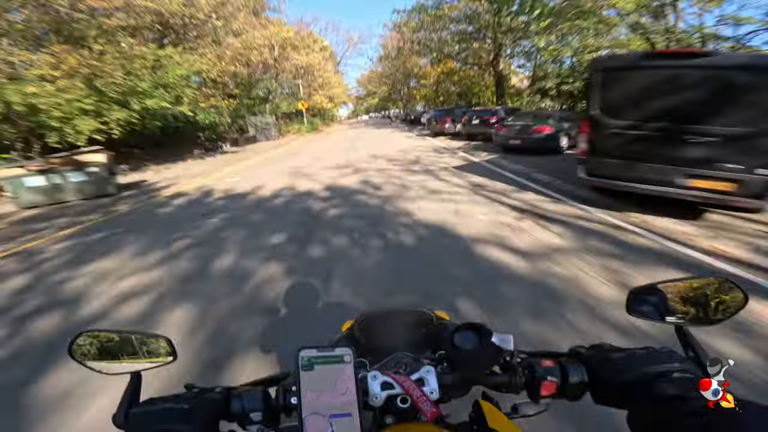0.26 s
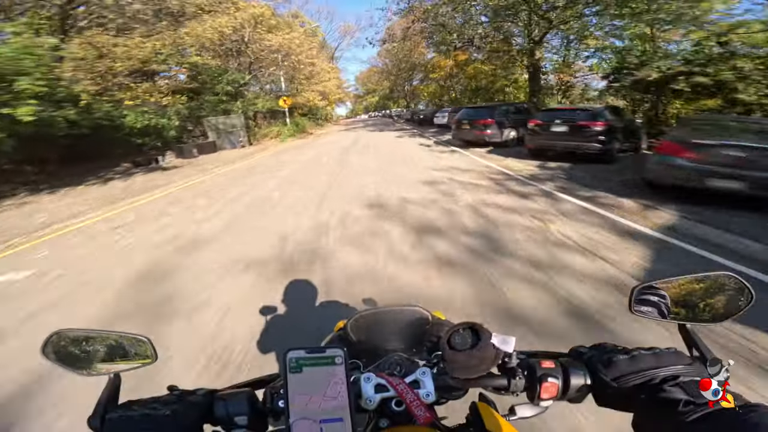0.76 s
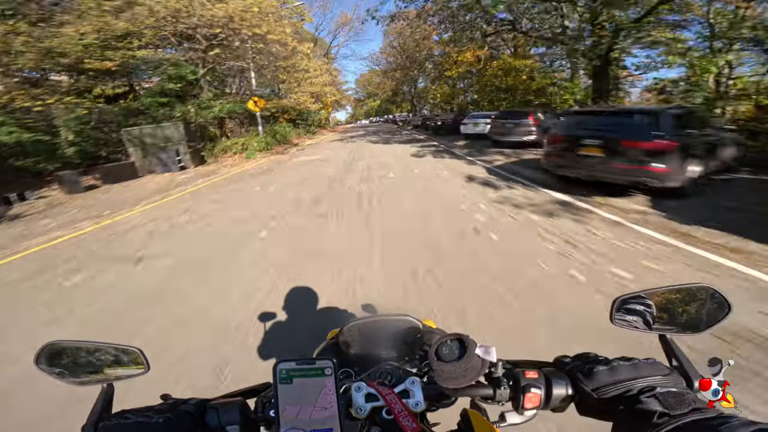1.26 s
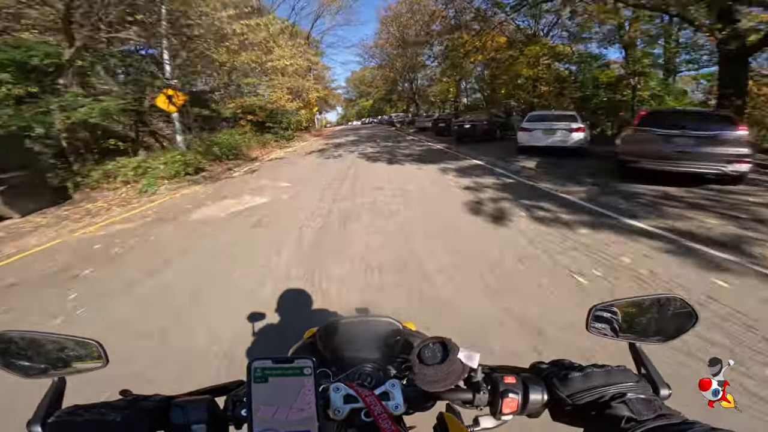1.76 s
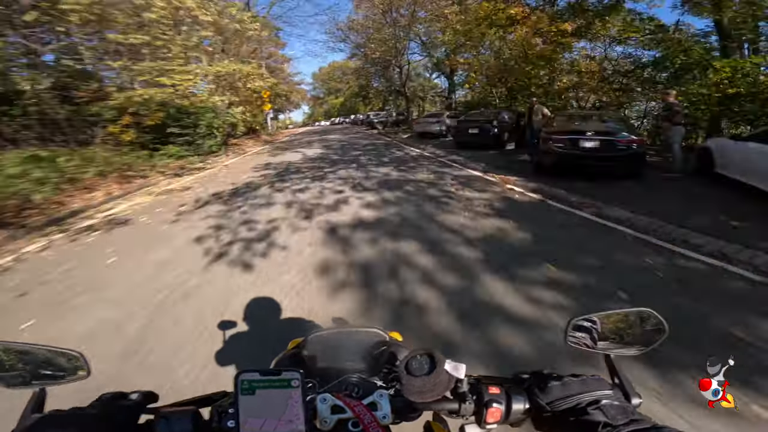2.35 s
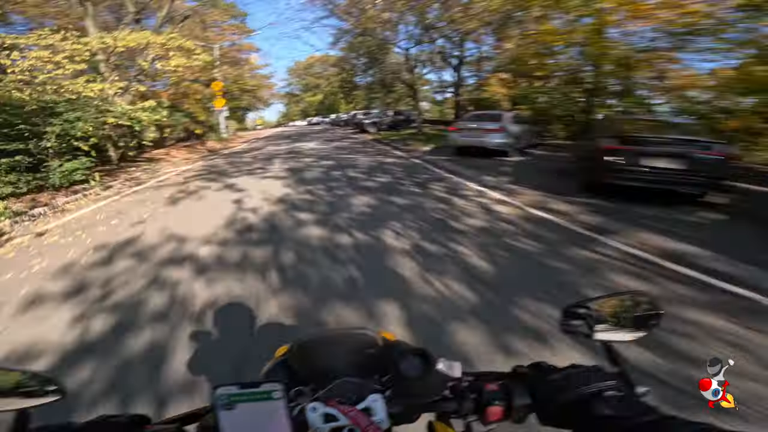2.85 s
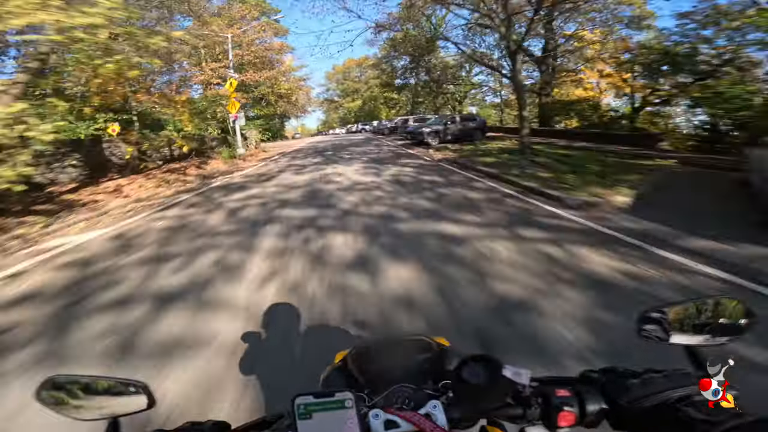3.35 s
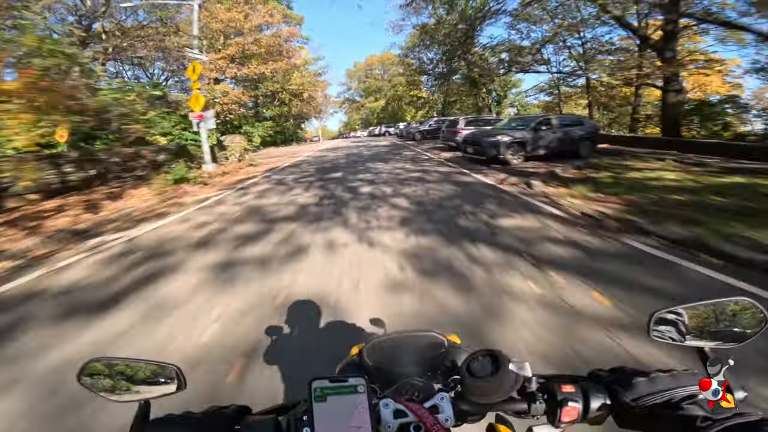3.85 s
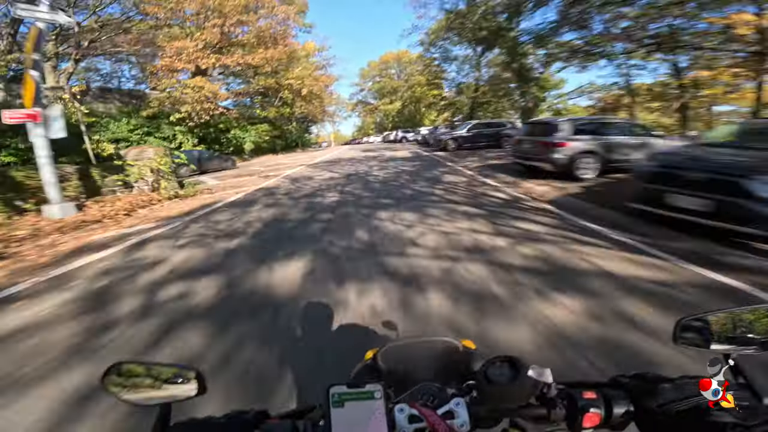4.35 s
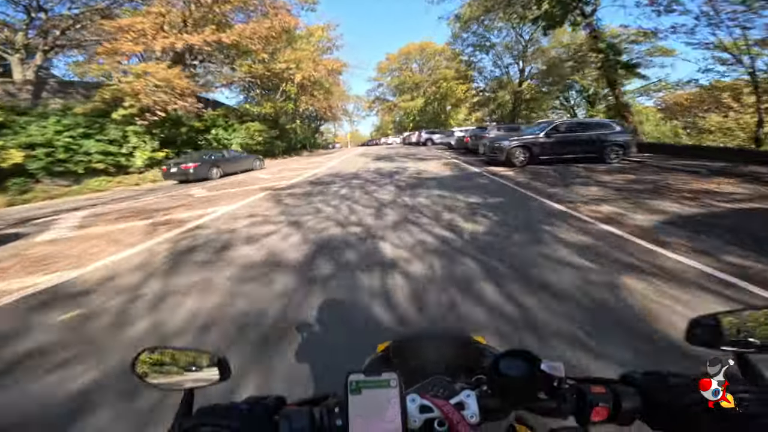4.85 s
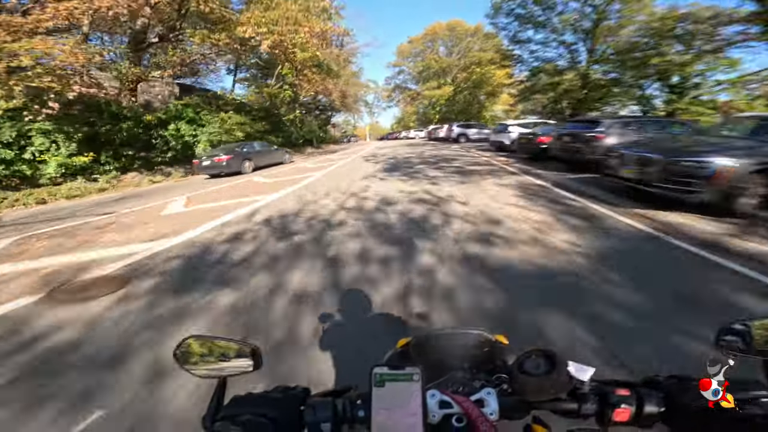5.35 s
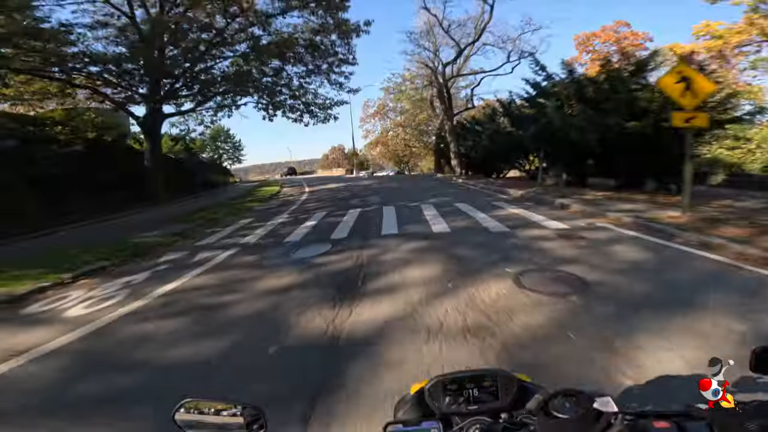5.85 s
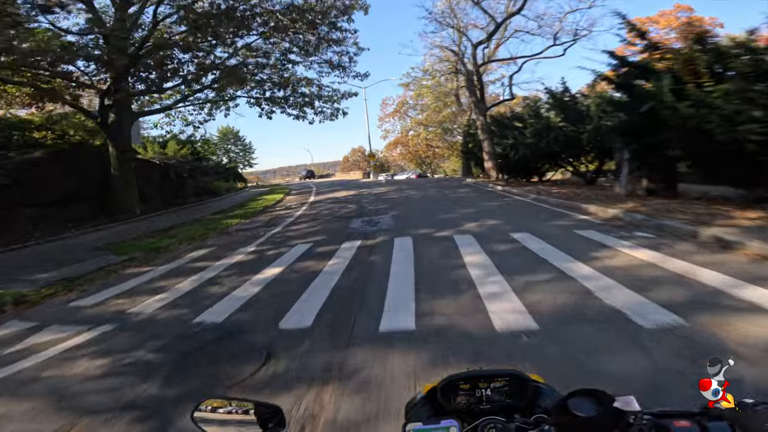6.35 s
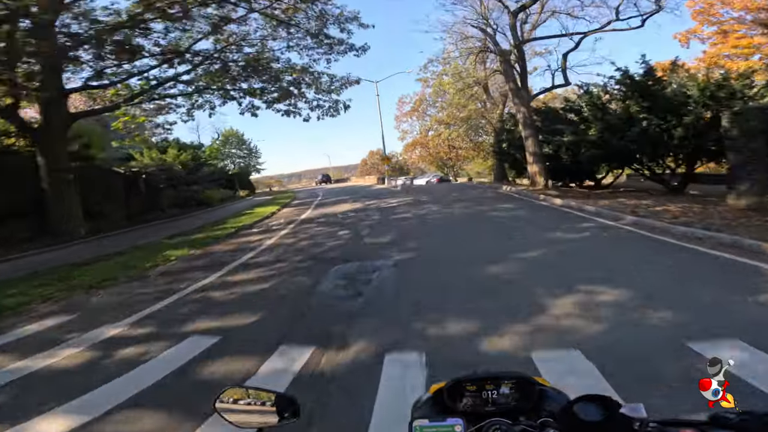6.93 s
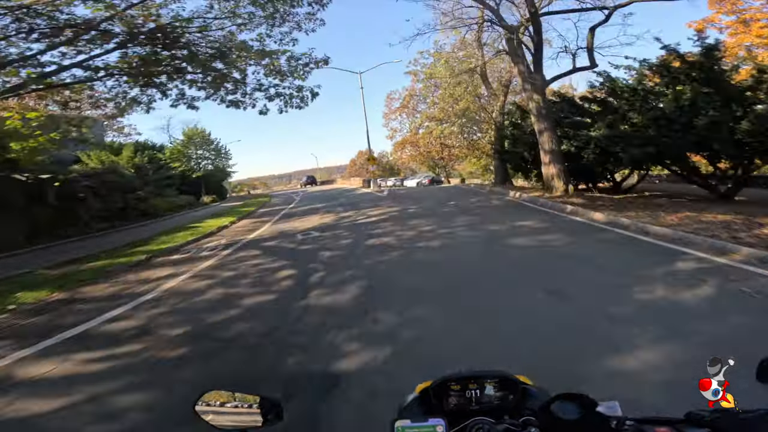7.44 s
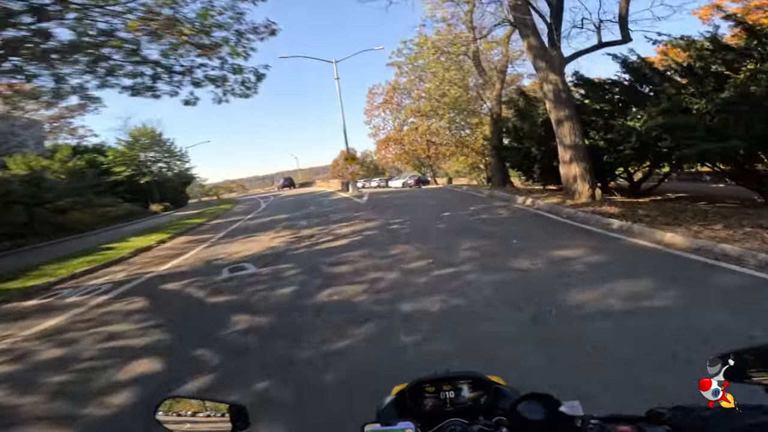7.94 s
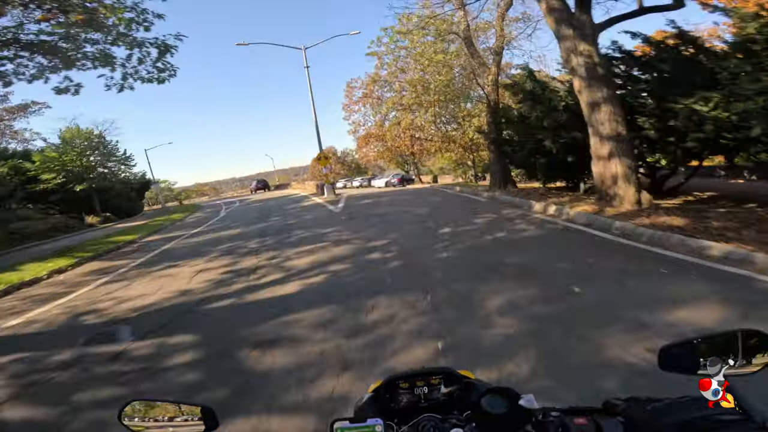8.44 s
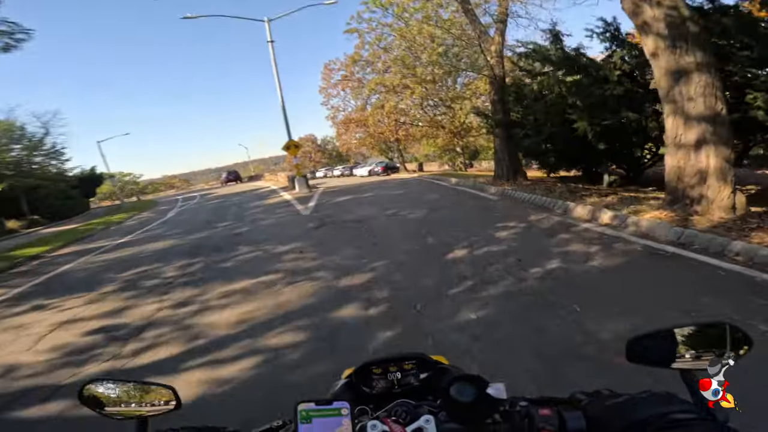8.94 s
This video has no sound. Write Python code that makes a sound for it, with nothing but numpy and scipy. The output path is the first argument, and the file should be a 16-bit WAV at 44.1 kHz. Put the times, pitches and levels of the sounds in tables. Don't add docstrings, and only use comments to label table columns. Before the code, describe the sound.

A motorcycle's open exhaust drones up and eases through a steady cruise, burbles off-throttle, then cuts to slower riding that pops, sinks and pulls away.

```python
import sys
import numpy as np
from scipy import signal
from scipy.io import wavfile
from scipy.ndimage import uniform_filter1d

SR = 44100
rng = np.random.default_rng(int(sys.argv[2]) if len(sys.argv) > 2 else 0)


def makeup_ratio(level_db):
    decades = np.asarray(level_db, float) / 20
    return 10 ** decades


def to_wav(s):
    ch = np.atleast_2d(s).T
    pcm = np.round(np.clip(ch, -1, 1) * 32767)
    wavfile.write(sys.argv[1], SR, pcm.astype(np.int16))


N = 405719
CHANGE_S = 5.8442

# time_s, firing_rate_hz
FAST_SPEED = [(0, 83.2), (.14, 83.8), (.39, 83.7), (.65, 85.8), (1.67, 98.1), (2.09, 103), (2.45, 104.6),
              (2.9, 103.6), (3.25, 102.6), (3.42, 103), (3.49, 101.1), (3.75, 100.6), (4.22, 98.6),
              (4.75, 97), (5.05, 92.3), (5.2, 92), (5.51, 86.2), (5.84, 83.8)]
SLOW_SPEED = [(5.85, 65), (5.98, 62.3), (6.04, 63.2), (6.29, 62.7), (6.41, 63.2), (6.47, 64.6), (6.7, 64.4),
              (6.77, 63.5), (6.86, 60), (7.1, 58.7), (7.36, 53.8), (7.69, 48.2), (7.89, 45.6), (8.3, 45.6),
              (8.46, 44.6), (8.74, 45.3), (9.05, 47.1), (9.2, 47.4)]
DUE_FAST = [5.8269]
DUE_SLOW = [5.894, 6.836, 6.939, 7.141, 7.282, 7.434, 7.551, 7.631, 7.841, 8.044, 8.353]
WANDER, LASH_HZ, LASH = .003, 7.5, (.002, .012)
# time_s, opening_0_to_1
THROTTLE = [(0, 0.89), (2.3, 0.87), (3.5, 0.52), (4.8, 0.38), (4.93, 0.24), (5.0, 0.18), (5.08, 0.07),
            (5.84, 0.06), (5.89, 0), (5.95, 0.4), (5.98, 0.95), (6.79, 0.97), (6.82, 0.08), (6.9, 0),
            (8.05, .0), (8.335, 0.04), (8.35, 0.91), (9.2, 0.95)]
OPENINGS = [0, .3, .6, 1]

CYLINDERS = [1, .92, 1.05]
# fast_delay_s, slow_delay_s
HEADER_DELAYS = [(0, 0), (.00005, .0001), (-.00003, -.00007)]
SKIPS = [2.93, 3.185, 3.595, 3.72, 4.25, 4.56]
UNEVEN_HOT = [.45, .33, .12, .09]
UNEVEN_COOL = [.6, .3, .15, .1]
FLOW_DB, SHUT_FLOW_DB = -18, (3, 9)

# pitch_hz, width_hz, level_db, swing_sense
PIPE_HOT = [
    [(87.5, 21, 11, 0.14), (192, 116, -0.5, -0.5)],
    [(265, 37, 12.5, 0.81)],
    [(355.6, 67.4, 14.5, -0.43)],
    [(472.4, 116, 6, 0.31), (673, 67, -24.5, -1.3), (711.5, 25, -22, 0.89), (842, 100, -16, -0.24), (915, 65, -18, 0.19), (1176, 73, -23, 0.33), (1345, 6, -18, -0.46), (1480, 41, -23, 0.6)],
]
PIPE_COOL = [
    [(59, 79, -19, 0.9), (121, 136, 18, -0.08), (195.3, 9, 1, 0.82)],
    [(303.4, 79, 0.85, 0.94)],
    [(347.6, 175, 1.6, -0.86)],
    [(494.6, 96, -4, 0.77), (664, 31, -19, -1.3)],
]
PIPE_IDLE = [
    [(96, 37, -15.5, -1.1), (143.3, 81, -8.5, -0.61), (219, 33, -29, 0.21)],
    [(282, 63, -20.5, 0.98)],
    [(326.2, 49, -14, 0.76)],
    [(421, 174, -33, -1.32), (498, 110, -35.5, 1), (669, 39, -49.5, -1.2)],
]
IDLE_S = (7.2, 7.5)
# firing_rate_hz, lag_rad
PUMP_LAG = [(46, -.6), (60, .8)]
TRAP_HZ, TRAP_WIDTH_HZ, TRAP_SHARE = 417.4, 15, 0.57
SPEEDS = [45, 63, 83, 86, 89.5, 93, 96, 99.5, 102, 104.5]
# pump_db, low_db, middle_db, upper_db, top_over_upper_db
OPEN_LEVELS = [(-48, -34, -44.5, -44.5, -6.5), (-38, -36, -37, -43, -10), (-33.5, -39, -35, -38, -6.5),
               (-29.5, -36, -65.5, -34, -11), (-32, -36, -48, -33.5, -7.5), (-31.5, -37, -44.5, -38, 2.5),
               (-34.5, -30.5, -50.5, -37, 0.5), (-32, -37.5, -59, -38, 3.5), (-30, -37, -45.5, -40, 5.5),
               (-34, -35, -49, -39.5, 7.5)]
# pump_db, low_db, middle_db, upper_db, top_over_upper_db
EASED_HOT = [
    (1.5, -15, -0.5, -18, -11),
    (-3.5, -9, 13.5, 1, -9.5),
    (-10, 2, 2.5, -1, -6.5),
]
EASED_COOL = [
    (5.5, -16, -12.5, -16.5, -0.45),
    (-10, -0.5, -3.5, 2, -2),
    (6, -14.5, -19.5, -4.5, -1.6),
]
SURGE_LEVELS = [-1, 8, -7, 1.4, 2]
SURGE_S = 0.028
SURGING = [.3, .4, .7, .2]
# time_s, length_s, depth_ratio
STUMBLES = [(.55, .08, -.1), (1.894, 0.057, -.2), (2.12, 0.052, -.2), (2.417, .04, -.2), (3.29, .02, -.3),
            (1.5, 0.098, 1), (3.116, 0.1, 0.44), (3.242, 0.015, 0.8), (3.4, 0.022, 0.2),
            (3.576, 0.053, 0.27), (3.946, 0.027, 0.3), (4.25, 0.057, 1), (4.447, 0.0094, 0.45),
            (4.586, 0.023, 0.95), (4.72, 0.014, 1), (4.85, 0.014, 0.7)]
STUMBLE_LEVELS = [2.5, -11, 1, -0.5, 1.5]

# pitch_hz, density_db_per_hz
HISS_FAST = [(450, 15), (700, 5), (1100, -1.5), (1500, 1), (2200, -3), (2700, -5.5), (3300, -11),
             (5400, -17), (6300, -23.5), (7300, -25.5), (7900, -34), (11600, -38), (13400, -53.5)]
HISS_SLOW = [(450, 15), (680, -4), (820, -17), (1050, -5.5), (1230, -15), (1500, -3.5), (2000, -9.5),
             (2300, -16), (2900, -22.5), (3400, -24), (3800, -27.5), (5500, -30), (7600, -40),
             (10000, -47.5), (13500, -50)]
HISS_FAST_DB, HISS_SLOW_DB = -52, -55.5
HISS_PER_OCTAVE_DB, USUAL_HZ, HISS_SHUT_DB = (6, 5.5), (110, 64), -1.5
# multiple_of_firing_rate, width_hz, level_db
WHINE = [
    (14.2, 60, -10),
    (27.1, 110, 0),
    (55, 500, -17),
]
WHINE_OPEN_DB, WHINE_SHUT_DB = (-76, -74), (-71.5, -70)
WHINE_BEST_HZ, WHINE_SPAN_HZ, WHINE_BEST_DB = 2530, 220, 4.5
# pitch_hz, width_hz, fast_level_db, slow_level_db
PANELS = [
    (1360, 60, -72, -72),
    (2020, 90, -69, -77),
    (2450, 250, -74, -80),
]
BUZZ_OPEN_DB = 2.5

# pitch_hz, density_db_per_hz
WIND = [(12, -20), (30, -8), (60, 0), (110, -6), (200, -14), (400, -18), (540, -24), (650, -38),
        (1200, -70)]
# time_s, level_db
WIND_LEVELS = [(0, -54), (1, -49), (3, -50), (3.6, -47), (4.2, -48), (5, -45), (5.45, -46), (5.55, -53),
               (7.5, -55), (8.2, -54), (9.2, -56)]

# time_s, peak_db
THUDS = [(1.61, -41), (1.87, -40), (2.2, -48), (2.36, -38.5), (2.93, -39), (3.185, -30), (3.33, -38),
         (3.601, -32), (3.72, -33), (4.25, -41), (4.889, -33), (5.2, -38), (5.27, -39), (5.35, -32),
         (5.411, -37), (5.475, -28)]
THUD_HZ, THUD_S = 63, .009

# time_s, peak_db
SINGLES = [(5.178, -35), (5.219, -32), (5.269, -57), (5.346, -31), (5.403, -30), (5.462, -30.5),
           (5.501, -34.5), (6.94, -34), (6.992, -34), (7.143, -36), (7.552, -28.5), (7.793, -35),
           (7.841, -35), (7.955, -33), (6.896, -47), (7.212, -50), (8.019, -40), (8.246, -29), (8.268, -33),
           (8.155, -33.5), (5.91, -40), (5.925, -30)]
PAIRS = [(6.799, -45), (7.285, -33), (7.357, -33), (7.436, -33.5), (7.736, -34), (8.178, -28), (8.291, -25)]
TRIPLES = [(5.895, -30.5), (6.839, -30), (7.632, -31), (8.044, -30.5)]
POP_MIX = [
    (0.511, 2.4, 1.3),
    (1.059, 2.7, 0.64),
    (1.4, 1.3, 1.5),
]
POP_S = (6.7, 6.8)

RATTLE_S, RATTLE_DB = 8.52, -83


def evened(x):
    return x / np.sqrt(np.mean(x ** 2) + 1e-20)


def drifting(size):
    once = uniform_filter1d(rng.standard_normal(N), size=size)
    return evened(uniform_filter1d(once, size=size))


def over_time(rows):
    s, *columns = np.transpose(rows)
    return [np.interp(np.arange(N) / SR, s, c) for c in columns]


def either(before, after):
    return np.where(np.arange(N) < CHANGE_S * SR, before, after)


def staged(hot, cool, idle, between=IDLE_S):
    share = np.interp(np.arange(N) / SR, between, [0, 1])
    return either(hot, (1 - share) * cool + share * idle)


def by_throttle(hot, cool):
    opening = over_time(THROTTLE)[0]
    return either(np.interp(opening, OPENINGS, hot), np.interp(opening, OPENINGS, cool))


def resonate(x, hz, width):
    turn = np.exp(2j * np.pi * np.cumsum(hz * np.ones(len(x))) / SR)
    r = np.exp(-np.pi * width / SR)
    smooth = signal.lfilter([1], np.convolve([1, -r], [1, -r]), x / turn)
    return evened((turn * smooth).real)


def ring(modes):
    t = np.arange(6000) / SR
    waves = np.zeros(6000)
    for hz, width, db, sense in modes:
        swell = width ** 2 * t * np.exp(-np.pi * width * t)
        waves += sense * makeup_ratio(db) * swell * np.sin(2 * np.pi * hz * t)
    return np.convolve(waves, np.hanning(30))[:6000]


def coloured(points, patchy_db):
    hz = np.fft.rfftfreq(2048, 1 / SR)
    a, b, patches = rng.standard_normal((N // 512 + 5, 1025, 3)).T
    patches = evened(uniform_filter1d(uniform_filter1d(patches, 14, axis=0), 6, axis=1))
    f, level_db = np.transpose(points)
    shape_db = np.interp(np.log(hz + 1), np.log(f), level_db, left=-90, right=-90)
    z = (a + 1j * b) * makeup_ratio(shape_db[:, None] + patchy_db * patches)
    return evened(signal.istft(z, nperseg=2048, noverlap=1536)[1][:N])


def crank(rate, due):
    turns = np.cumsum(rate) / SR
    at = np.round(np.multiply(due, SR)).astype(int)
    return turns + np.interp(np.arange(N), at, np.round(turns[at]) - turns[at])


def firings(rate, turns):
    at = np.flatnonzero(np.diff(np.floor(turns))) + 1
    force, *shape = rng.standard_normal((1000, 5))[:len(at)].T
    uneven = by_throttle(UNEVEN_HOT, UNEVEN_COOL)[at]
    strength = np.resize(CYLINDERS, len(at)) + uneven * (.4 * force + .9 * np.array(shape))
    strength[:, np.searchsorted(at, np.multiply(SKIPS, SR))] = .3
    cylinder = np.arange(len(at)) % len(CYLINDERS)
    stretch = (at > CHANGE_S * SR).astype(int)
    late = np.round(np.array(HEADER_DELAYS)[cylinder, stretch] * SR).astype(int)
    clicks = np.zeros((len(shape), N))
    clicks[:, at + late] = strength
    fast_shut, slow_shut = SHUT_FLOW_DB
    flow_db = FLOW_DB - either(0, 1.6) + by_throttle([fast_shut, 0, 0, 0], [slow_shut, 0, 0, 0])
    flow = makeup_ratio(flow_db) * np.sqrt(rate / SR) * rng.standard_normal(N)
    steady = np.mean(CYLINDERS) * rate / SR * (1 + 2 * np.cos(2 * np.pi * turns))
    return clicks + flow - steady


def levels(rate):
    t = np.arange(N) / SR
    surge = np.tanh(drifting(round(SURGE_S * SR))) * by_throttle(SURGING, SURGING)
    lean = sum(depth * np.exp(-.5 * ((t - s) / length) ** 2) for s, length, depth in STUMBLES)
    columns = zip(np.transpose(OPEN_LEVELS), np.transpose(EASED_HOT), np.transpose(EASED_COOL),
                  SURGE_LEVELS, STUMBLE_LEVELS)
    out = []
    for open_db, hot, cool, wobble_db, sag_db in columns:
        steady_db = np.interp(rate, SPEEDS, open_db) + by_throttle([*hot, 0], [*cool, 0])
        out.append(steady_db + wobble_db * surge + sag_db * lean)
    return out


def exhaust(rate, turns):
    pump_db, *burn_db, sharp_db = levels(rate)
    burn_db.append(burn_db[-1] + sharp_db)
    lag = np.interp(rate, *np.transpose(PUMP_LAG))
    out = np.sqrt(2) * makeup_ratio(pump_db) * np.cos(2 * np.pi * turns - lag)
    groups = zip(firings(rate, turns), burn_db, PIPE_HOT, PIPE_COOL, PIPE_IDLE)
    for clicks, level_db, *pipes in groups:
        voices = [evened(signal.oaconvolve(clicks, ring(modes))[:N]) for modes in pipes]
        rung = staged(*voices)
        out += makeup_ratio(level_db) * rung / np.sqrt(uniform_filter1d(rung ** 2, size=13000))
    trapped = signal.lfilter(*signal.iirpeak(TRAP_HZ, TRAP_HZ / TRAP_WIDTH_HZ, SR), out)
    return either(TRAP_SHARE * trapped - out, out)


def engine_swell(rate, shut):
    octaves = np.log2(rate / either(*USUAL_HZ))
    return makeup_ratio(either(*HISS_PER_OCTAVE_DB) * octaves + HISS_SHUT_DB * shut)


def hiss(turns):
    fast = makeup_ratio(HISS_FAST_DB) * coloured(HISS_FAST, 1.2)
    slow = makeup_ratio(HISS_SLOW_DB) * coloured(HISS_SLOW, 1.0)
    puffs = evened(1 + either(0.19, 0.25) * np.exp(-(turns % 1) / 0.2))
    return either(fast, slow) * puffs


def bodywork(shake, shut):
    out = sum(makeup_ratio(either(*db)) * resonate(shake, hz, width) for hz, width, *db in PANELS)
    buzz = staged(0, 0, 1 - shut) * resonate(shake, 1334, 45)
    return out + makeup_ratio(PANELS[0][3] + BUZZ_OPEN_DB) * buzz


def gear_whine(rate, shake, shut):
    whine = sum(makeup_ratio(db) * resonate(shake, k * rate, width) for k, width, db in WHINE)
    level_db = (1 - shut) * either(*WHINE_OPEN_DB) + shut * either(*WHINE_SHUT_DB)
    off_best = (WHINE[1][0] * rate - WHINE_BEST_HZ) / WHINE_SPAN_HZ
    return makeup_ratio(level_db + WHINE_BEST_DB * np.exp(-off_best ** 2)) * whine


def machinery(rate, turns):
    shake = rng.standard_normal(N)
    shut = 1 - over_time(THROTTLE)[0]
    noisy = engine_swell(rate, shut) * (hiss(turns) + bodywork(shake, shut))
    return noisy + gear_whine(rate, shake, shut)


def wind():
    return makeup_ratio(over_time(WIND_LEVELS)[0]) * coloured(WIND, 0.46)


def ticks():
    out, t = np.zeros(N), np.arange(1500) / SR
    out[:1500] += makeup_ratio(-37) * np.exp(-t / .001)
    out[round(CHANGE_S * SR):][:1500] -= makeup_ratio(-33.5) * np.exp(-t / 0.0025)
    rattle = signal.lfilter([1, 0, -1], [1, -1.3, .6], rng.standard_normal(1500))
    out[round(RATTLE_S * SR):][:1500] += makeup_ratio(RATTLE_DB) * np.exp(-t / 0.0059) * rattle
    return out


def thuds():
    out, t = np.zeros(N), np.arange(-2000, 2000) / SR
    s, peak_db = np.transpose(THUDS)
    out[np.round(s * SR).astype(int)] = makeup_ratio(peak_db)
    swing = np.exp(-.5 * (t / THUD_S) ** 2) * np.sin(2 * np.pi * THUD_HZ * t)
    return signal.oaconvolve(out, swing, "same")


def burble(rate):
    clicks = np.zeros(N)
    for count, runs in enumerate((SINGLES, PAIRS, TRIPLES), start=1):
        k = np.arange(count)
        for s, db in runs:
            pop_s = s + k / rate[round(s * SR)]
            clicks[np.round(pop_s * SR).astype(int)] += makeup_ratio(db - 2.0 * k)
    voices = []
    for pipe, (a, b, c) in zip((PIPE_HOT, PIPE_COOL, PIPE_IDLE), POP_MIX):
        low, middle, upper, top = pipe
        blow = a * ring(low) + b * ring(middle) + c * ring(upper + top)
        voices.append(signal.oaconvolve(clicks, blow / abs(blow).max())[:N])
    return staged(*voices, between=POP_S)


def scene():
    lash = either(*LASH) * np.sin(2 * np.pi * LASH_HZ * np.arange(N) / SR)
    speed = either(*over_time(FAST_SPEED), *over_time(SLOW_SPEED))
    rate = speed * (1 + WANDER * drifting(1700) + lash)
    turns = either(crank(rate, DUE_FAST), crank(rate, DUE_SLOW))
    engine = exhaust(rate, turns) + machinery(rate, turns)
    return (engine + wind() + ticks() + thuds() + burble(rate))[None]


def top_cut(x):
    return signal.sosfilt(signal.butter(12, 14900, fs=SR, output="sos"), x)


def record(dry):
    fade = np.minimum(np.arange(N, 0, -1) / 150, 1)
    return top_cut((dry - .0005) * fade)


dry = scene()
out = record(dry)
to_wav(out)
```